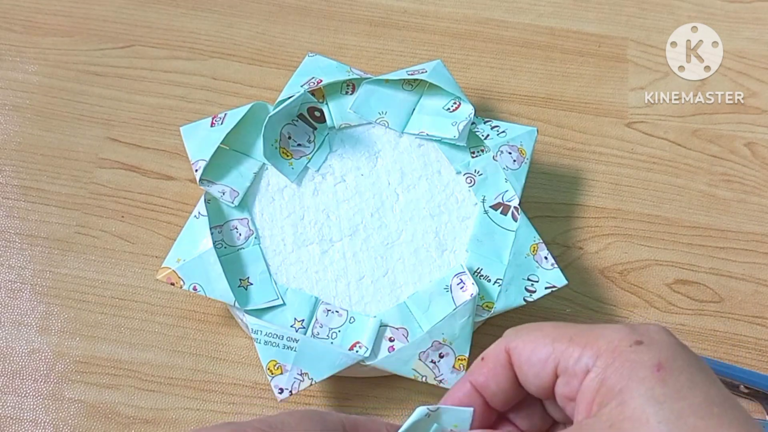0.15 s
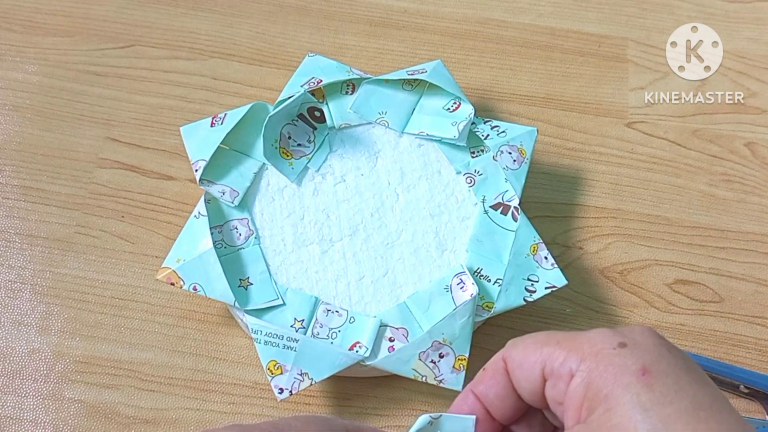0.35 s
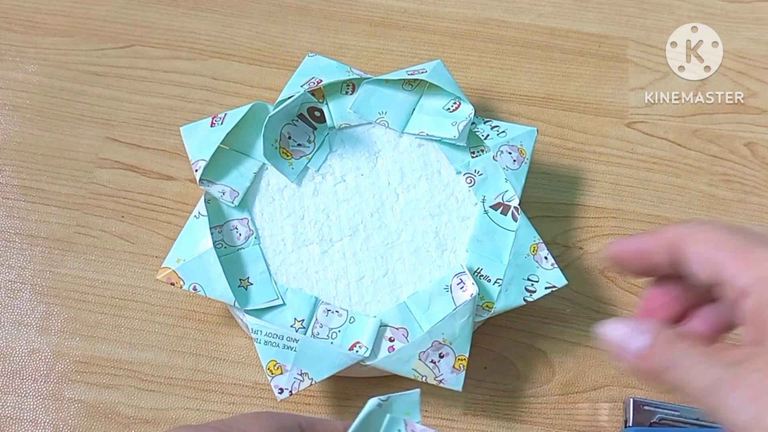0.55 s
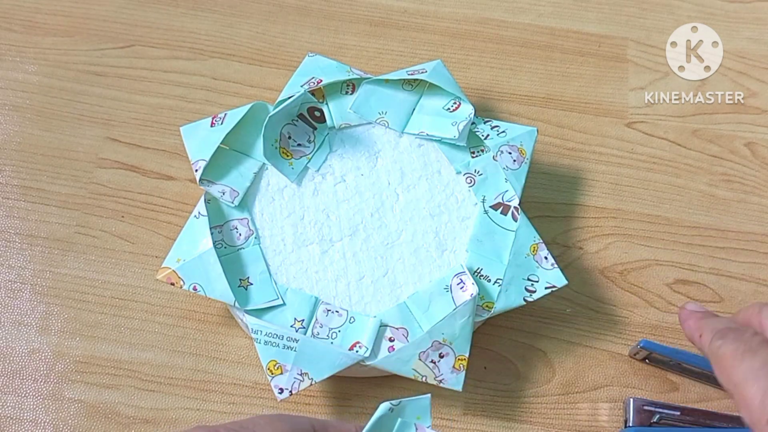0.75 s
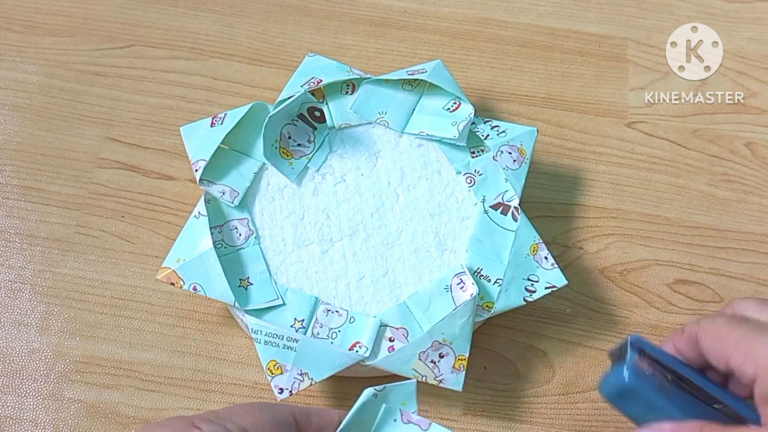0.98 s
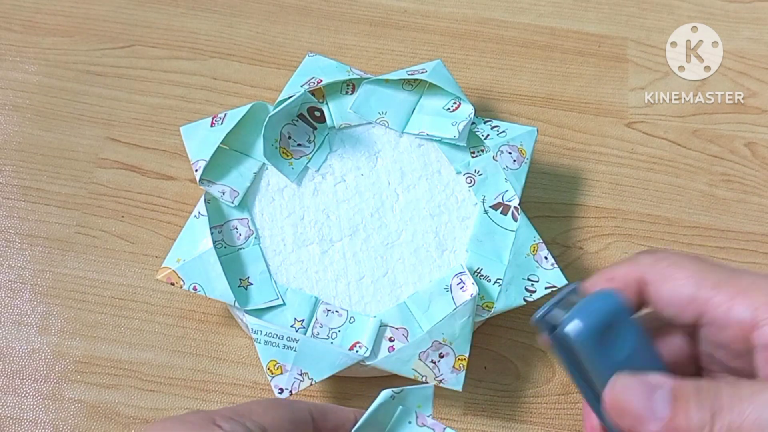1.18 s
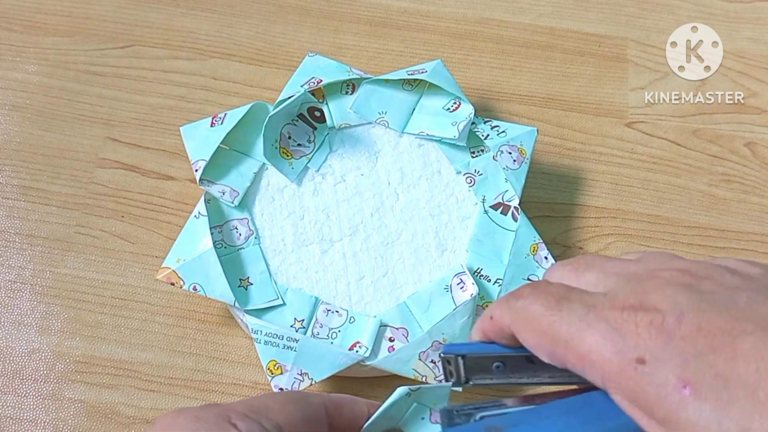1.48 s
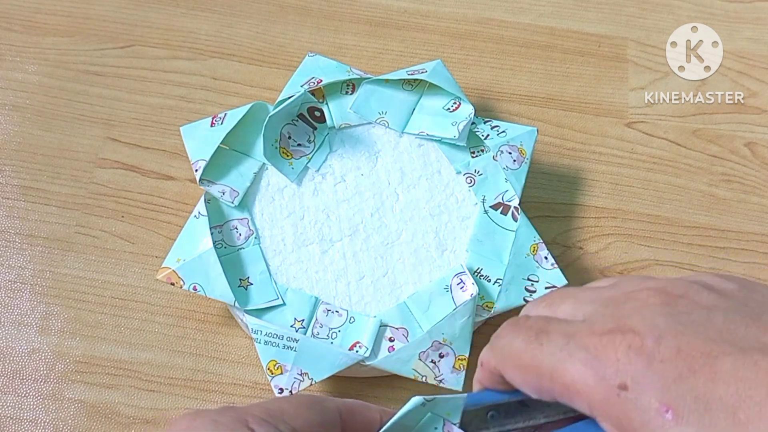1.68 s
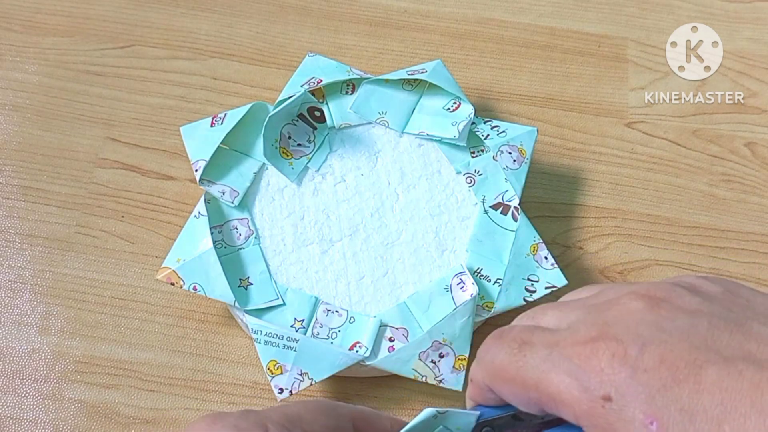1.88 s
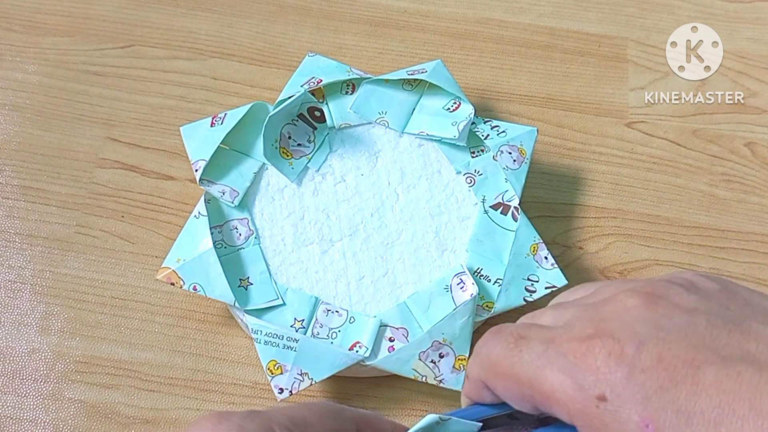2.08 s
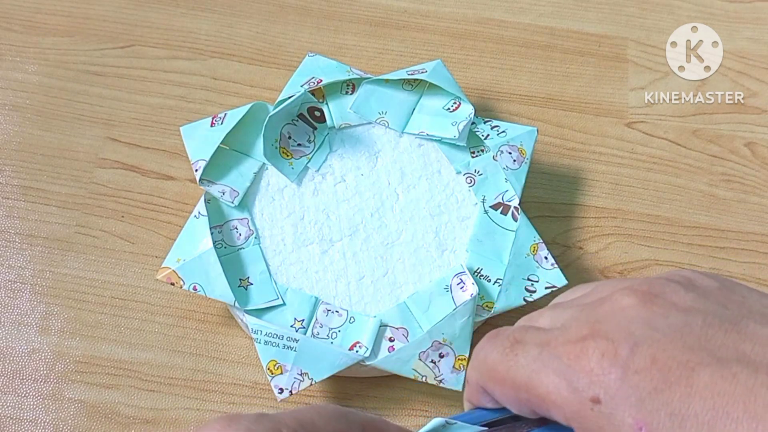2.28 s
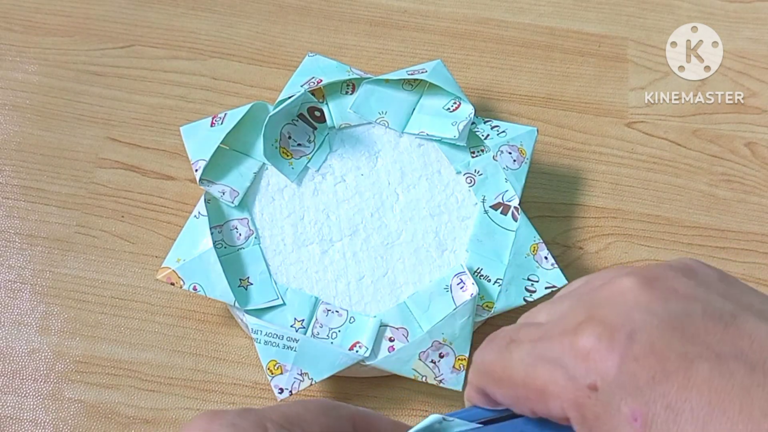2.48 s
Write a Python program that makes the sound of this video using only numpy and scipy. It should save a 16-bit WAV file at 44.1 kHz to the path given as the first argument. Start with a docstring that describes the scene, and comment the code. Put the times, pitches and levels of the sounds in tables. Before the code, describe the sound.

In a small, slightly ringing room, a hand stapler is picked up with light clicks after a short paper rustle. It creaks faintly, then punches through with a sharp metallic snap and springs back, heard close up.

```python
"""Stapling folded paper

Folded paper rustles as it is let go on a wooden table. A small hand stapler ticks and rubs as it is
picked up and slid over the fold, then creaks under the hand. It punches a staple through with a loud
snap and snaps again as it springs open: each time, a crunch of metal makes its body ring.
A small hard room rings after every click, over a faint low rumble."""
import sys
import numpy as np
from scipy import signal
from scipy.fft import rfft, irfft
from scipy.io import wavfile
from scipy.ndimage import uniform_filter1d

SR = 44100
rng = np.random.default_rng(int(sys.argv[2]) if len(sys.argv) > 2 else 0)


def pcm_store(signal):
    """Save signal as 16-bit PCM."""
    levels = np.round(np.clip(np.atleast_2d(signal), -1, 1) * 32767)
    wavfile.write(sys.argv[1], SR, levels.astype(np.int16).T)


N = 116865


# the tones the stapler rings with when shut: (pitch [Hz], width [Hz], relative level [dB])
SHUT_TONES = [(520, 190, 6.5), (740, 200, 8.5), (1100, 350, 4), (1660, 130, 16), (1970, 300, 21),
              (2540, 170, 13), (3190, 200, 20), (3490, 200, 17), (4150, 130, 16), (4430, 280, 21),
              (5290, 380, 20), (5940, 170, 15), (6430, 200, 22), (7250, 600, 9), (8900, 700, 16),
              (9720, 250, 14), (10380, 450, 20), (10880, 170, 18), (11350, 250, 16), (14730, 350, 15)]
def punch():
    """The staple punches through the paper and shakes the shut stapler."""
    crunch = burst(rise_s=.0002, hold_s=.0036, decay_s=.0011)
    return snap(crunch, SHUT_TONES, start_s=1.9896, db=-15, low_cut_hz=410, room_db=-3.4, widening=2.2)


# the tones the stapler rings with as it opens: (pitch [Hz], width [Hz], relative level [dB])
OPEN_TONES = [(960, 200, 9.5), (1390, 180, 7), (1740, 130, 16), (1910, 120, 17), (2400, 280, 17),
              (3420, 400, 18.5), (4000, 280, 14.5), (5240, 260, 10), (5640, 260, 14), (6180, 240, 13),
              (6560, 200, 9), (7020, 350, 8), (9050, 600, 9), (9730, 350, 12.5), (10420, 220, 12),
              (10740, 250, 12), (11350, 450, 10), (14300, 350, 6), (15230, 350, 7)]
def spring_open():
    """The arm springs back with a second, quieter snap."""
    crunch = burst(rise_s=.0009, hold_s=.0013, decay_s=.0017)
    return snap(crunch, OPEN_TONES, start_s=2.2445, db=-19.9, low_cut_hz=820, room_db=-9.6, widening=1.6)


def snap(crunch, tones, start_s, db, low_cut_hz, room_db, widening, crack_db=-2):
    """A crunch of metal rings the stapler. Gives two tracks: one heard directly, one for the room."""
    hz = np.fft.rfftfreq(len(crunch), 1 / SR)
    sharp = full_power = 0
    for k, (pitch, width, tone_db) in enumerate(tones):
        offset = 2 * (hz - pitch) / width
        sharp += (-1) ** k * amp(tone_db) / (1 + offset ** 2)  # close by, neighbouring tones cancel
        full_power += (amp(tone_db) / (1 + (offset / widening) ** 2)) ** 2  # fuller in the room
    low_cut = hz ** 8 / (hz ** 8 + low_cut_hz ** 8)
    tracks = []
    for peaks, level_db in ((sharp, db), (np.sqrt(full_power), db + room_db)):
        body = ringing(low_cut * np.hypot(peaks, amp(crack_db)))  # the tones plus a toneless crack
        sound = pulse_level(signal.fftconvolve(crunch, body))
        tracks.append(placed(start_s, amp(level_db) * sound))
    return np.array(tracks)


# six pitch ranges that make up a click: (low edge [Hz], high edge [Hz])
CLICK_BANDS = [(650, 1450), (1450, 2350), (2450, 4400), (4400, 7400), (7800, 11500), (11500, 16000)]
# paper ticks and stapler knocks: (time [s], fade time [s], then a relative level [dB] for each range)
SMALL_KNOCKS = [(.002, .014, -74, -71, -70, -62, -66, -67), (.3858, .002, -59, -47, -54, -52, -60, -63),
                (.4254, .002, -60, -46, -54, -61, -63, -70), (.4330, .003, -66, -58, -55, -56, -56, -60),
                (.4380, .002, -58, -43, -48, -52, -53, -58), (.4425, .008, -63, -51, -52, -48, -45.5, -46),
                (.5333, .0014, -50.5, -46, -40, -45, -39, -44),
                (.6555, .0025, -82, -57, -48, -45, -39, -52), (.6635, .004, -76, -52, -54, -55, -51, -63),
                (.7880, .007, -84, -55, -61, -57, -48.5, -62), (.7935, .003, -86, -52, -59, -59, -52, -62),
                (.9035, .0018, -86, -55, -71, -63, -53, -61), (.9125, .002, -80, -63, -60, -73, -72, -78),
                (.998, .008, -78, -64, -69, -74, -76, -84), (1.0245, .003, -82, -73, -73, -72, -63, -76),
                (1.0365, .003, -82, -71, -69, -72, -66, -78), (1.2537, .001, -86, -82, -84, -77, -69, -61),
                (1.3757, .0017, -88, -72, -69, -59, -44, -55),
                (1.8447, .0016, -76, -53, -55, -58, -68, -74), (1.8694, .002, -61, -51, -57, -54, -61, -63),
                (1.9183, .0018, -67, -50, -54, -52, -52, -60), (2.1988, .004, -84, -42, -50, -59, -62, -74),
                (2.2296, .0016, -84, -50, -54, -47, -51, -57), (2.5095, .003, -90, -64, -67, -69, -61, -62),
                (2.5808, .002, -78, -57, -58, -68, -72, -76), (2.5875, .002, -82, -63, -67, -63, -68, -70),
                (2.600, .012, -80, -57, -62, -69, -78, -78)]
def click(start_s, decay_s, *bands_db, trim_db=-4.5):
    """One small contact makes a burst of noise with its own mix of low and high."""
    noise = burst(rise_s=.0005, hold_s=.0009, decay_s=decay_s, passes=0)
    sound = 0
    for edges, db in zip(CLICK_BANDS, bands_db):
        band = signal.butter(4, edges, "band", fs=SR, output="sos")
        filtered = signal.sosfilt(np.vstack([band, band]), noise)  # twice, for steeper edges
        sound += amp(db + trim_db) * pulse_level(filtered)
    return direct_and_sent(placed(start_s, sound), room_db=-12)


# small parts left ringing by the knocks: (time [s], pitch [Hz], level [dB], fade time [s])
RINGING_PARTS = [(.3858, 1950, -48, .003), (.4215, 820, -52, .009), (.4254, 1720, -44, .002),
                 (.4380, 810, -50, .006), (.4440, 750, -58, .02), (.4380, 1750, -41, .003),
                 (.4410, 3450, -51, .004), (.4420, 11280, -54, .004), (.6570, 2200, -50, .008),
                 (.7712, 3050, -61, .004), (.7712, 2280, -62, .004), (.7915, 5700, -53, .004),
                 (.7915, 10230, -52, .003), (.7925, 1800, -52, .004), (.7925, 2800, -55, .003),
                 (.9035, 1680, -51, .003), (1.3760, 5220, -57, .004), (1.8694, 820, -60, .006),
                 (2.5095, 1700, -52, .005), (2.5095, 8640, -57, .002)]
def ring(start_s, hz, db, decay_s, rise_s=.0015):
    """A struck part vibrates at one pitch and quickly dies away."""
    t = np.arange(SR // 8) / SR
    shape = np.minimum(t / rise_s, 1) * np.exp(-t / decay_s)
    tone = pulse_level(shape * np.sin(2 * np.pi * hz * t))
    return direct_and_sent(placed(start_s, amp(db) * tone), room_db=-12)


# how loud the paper is as the fingers slip off: (time [s], level [dB])
RUSTLE_LOUDNESS = [(.43, -72), (.45, -57), (.49, -62), (.531, -66), (.540, -38.5), (.565, -37.3),
                   (.585, -42), (.62, -49.5), (.66, -58), (.74, -78)]
# the paper's mix of low and high: (pitch [Hz], relative level [dB])
PAPER_COLOUR = [(200, -45), (600, -31), (900, -17), (1350, -15), (2150, -4), (2450, -7), (2800, 0),
                (4800, -1), (6000, -7), (8400, -11), (9400, 2), (10700, 2), (13600, -12), (15300, -5)]
def rustle(grains_per_s=9000, spread_db=2.2):
    """Paper fibres catch and slip under the fingers, making a dense spray of tiny ticks."""
    grains = (rng.random(N) < grains_per_s / SR) * rng.standard_normal(N)
    grains *= amp(spread_db * np.minimum(rng.exponential(1, N), 4))  # a few stand out
    level_db = np.interp(np.arange(N) / SR, *np.transpose(RUSTLE_LOUDNESS), left=-np.inf, right=-np.inf)
    return direct_and_sent(amp(level_db) * unit(coloured(grains, PAPER_COLOUR)), room_db=-9)


# the stapler rubbing on table and paper:
# (time [s], length [s], first pitch [Hz], last pitch [Hz], width [Hz], level [dB])
STAPLER_RUBS = [(.81, .14, 1080, 1050, 100, -74), (.80, .24, 5700, 5850, 250, -79.5),
                (.90, .20, 4500, 4350, 500, -80), (1.58, .40, 1035, 1025, 75, -68),
                (1.60, .13, 6300, 6280, 120, -78.5), (1.56, .33, 1730, 1690, 240, -77),
                (1.61, .13, 5800, 5720, 200, -79.5), (1.64, .15, 5170, 5080, 160, -80),
                (1.61, .22, 4700, 4300, 550, -81), (1.62, .21, 3080, 3020, 250, -82.5),
                (2.572, .07, 10900, 10600, 700, -69.5)]
def rub(start_s, length_s, start_hz, end_hz, width_hz, db):
    """Rubbing makes a narrow band of noise that slides in pitch as it swells and fades."""
    progress = np.linspace(0, 1, round(length_s * SR))
    noise = (rng.standard_normal(N) + 1j * rng.standard_normal(N))[:len(progress)]
    narrow = signal.sosfilt(signal.butter(2, width_hz / 2, fs=SR, output="sos"), noise)
    pitch = start_hz + (end_hz - start_hz) * progress
    creak = (narrow * np.exp(2j * np.pi * np.cumsum(pitch) / SR)).real  # moves the noise up to the pitch
    sound = amp(db) * unit(creak * np.sin(np.pi * progress))
    return direct_and_sent(placed(start_s, sound), room_db=-8)


# soft pushes on the table: (time [s], level [dB], pitch [Hz], fade time [s])
TABLE_PUSHES = [(.690, -59, 95, .04), (1.981, -57, 45, .008), (2.315, -61, 130, .03)]
def thud(start_s, db, hz, decay_s):
    """The table gives a low, fading tone when the hand or the stapler pushes on it."""
    t = np.arange(SR // 2) / SR
    return placed(start_s, amp(db) * np.sin(2 * np.pi * hz * t) * np.exp(-t / decay_s))


# how long the room rings: (pitch [Hz], time to fade by 60 dB [s])
ROOM_FADE = [(300, .29), (800, .31), (2000, .395), (4000, .455), (6500, .405), (10500, .365), (15000, .29)]
# the room's mix of low and high: (pitch [Hz], relative level [dB])
ROOM_COLOUR = [(300, -1), (550, 3), (900, -2.5), (1350, -5), (2000, -4), (2600, 3), (3300, 1.5), (4200, .2),
               (5000, -1), (6500, 2.5), (7800, 2.8), (9200, 0), (10700, .5), (13000, 2.2), (15300, 5)]
def room(sent, gap_s=.004, wall_s=.0265, wall_spread_s=.006):
    """Weak first echoes, a strong return from the walls, then a tail where each pitch fades on its own."""
    t = np.arange(SR) / SR
    wall_swell = amp(3) * np.exp(-abs(t - wall_s) / wall_spread_s)
    strength = np.where(t < wall_s, amp(-4), np.hypot(1, wall_swell))
    echoes = rng.standard_normal(SR) * (t > gap_s) * strength
    echoes[round(wall_s * SR)] += amp(19.5)  # one clean echo off the nearest wall
    hz, age_s, bands = signal.stft(echoes, SR, nperseg=256)
    faded_db = 60 * age_s / read(ROOM_FADE, hz)[:, None]
    bands = bands * amp(read(ROOM_COLOUR, hz)[:, None] - faded_db)
    tail = signal.istft(bands, SR)[1]
    return signal.fftconvolve(sent, tail / np.linalg.norm(tail))[:N]


# the background's mix of low and high: (pitch [Hz], relative level [dB])
RUMBLE_COLOUR = [(25, -20), (45, -21), (70, -9), (140, 0), (180, -2), (260, -12), (370, -20), (600, -18),
                 (1100, -22.5), (2000, -26), (3000, -29), (5500, -30), (7500, -37.5), (10200, -34.5),
                 (13000, -38.5), (16000, -38)]
def background(db=-70):
    """Steady low rumble and faint hiss."""
    return amp(db) * unit(coloured(rng.standard_normal(N), RUMBLE_COLOUR))


def burst(rise_s, hold_s, decay_s, size=4096, passes=6):
    """A brief crunch of noise; each pass spreads it more evenly over all pitches."""
    t = np.arange(size) / SR
    shape = np.minimum(t / rise_s, 1) * np.exp(-np.maximum(t - hold_s, 0) / decay_s)
    x = shape * rng.standard_normal(size)
    for _ in range(passes):
        x = irfft(np.exp(1j * np.angle(rfft(x))))  # make all pitches equally strong
        loudness = np.sqrt(abs(uniform_filter1d(x ** 2, size=64)) + 1e-14)
        x = x * shape / loudness  # restore the rise and fall
    return x


def ringing(gain):
    """How an object rings after one sharp tap, given its gain from 0 Hz to SR / 2."""
    mirrored = np.concatenate([gain, gain[-2:0:-1]])
    log_gain = np.log(np.maximum(mirrored, 1e-4))
    return np.fft.ifft(np.exp(np.conj(signal.hilbert(log_gain)))).real


def amp(db):
    """Turns decibels into a number to multiply by."""
    return 10 ** (np.asarray(db) / 20)


def unit(x):
    """Scales a sound to an average strength (rms) of 1."""
    return x / np.sqrt(np.mean(x ** 2) + 1e-20)


def pulse_level(x):
    """Scales a short sound to strength 1 as if it lasted 10 ms."""
    return x / np.sqrt(np.sum(x ** 2) / (SR * .01) + 1e-20)


def read(points, hz):
    """Reads between a table's rows, with octaves evenly spaced."""
    pitches, values = np.transpose(points)
    return np.interp(np.log(hz + 1), np.log(pitches), values)


def coloured(x, points):
    """Gives a steady sound a table's mix of low and high."""
    hz = np.fft.rfftfreq(len(x), 1 / SR)
    return irfft(rfft(x) * amp(read(points, hz)), len(x))


def placed(start_s, sound):
    """A track that is silent but for one sound."""
    return np.concatenate([np.zeros(round(start_s * SR)), sound, np.zeros(N)])[:N]


def direct_and_sent(track, room_db):
    """Two copies of a track: one heard directly, a quieter one for the room."""
    return np.outer([1, amp(room_db)], track)


def scene():
    """Adds up the stapler, the paper, their echoes, the table and the background."""
    contacts = sum(click(*row) for row in SMALL_KNOCKS) + sum(ring(*row) for row in RINGING_PARTS)
    friction = rustle() + sum(rub(*row) for row in STAPLER_RUBS)
    direct, sent = punch() + spring_open() + contacts + friction
    thuds = sum(thud(*row) for row in TABLE_PUSHES)
    return (direct + room(sent) + thuds + background())[None]


def record(dry, cutoff_hz=15600):
    """Cuts away the very highest treble."""
    low_pass = signal.firwin(511, cutoff_hz, window=("kaiser", 8), fs=SR)
    return signal.oaconvolve(dry, low_pass[None], "same")


dry = scene()
out = record(dry)
pcm_store(out)
```